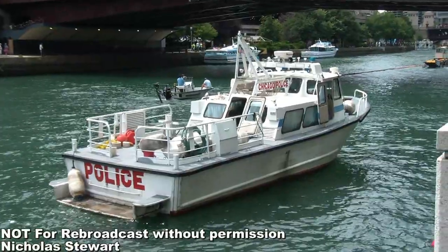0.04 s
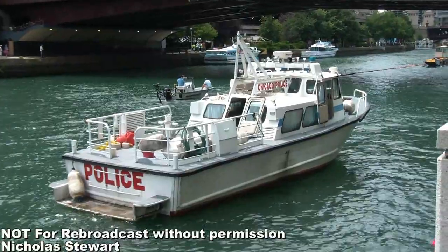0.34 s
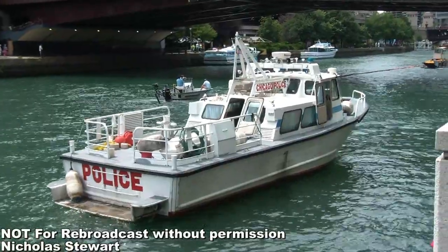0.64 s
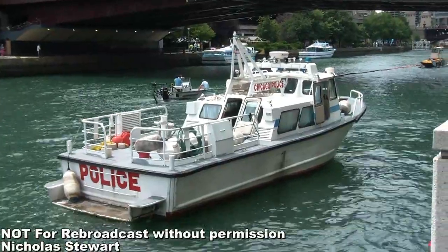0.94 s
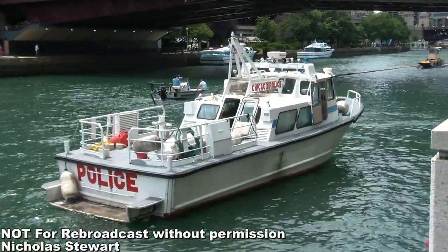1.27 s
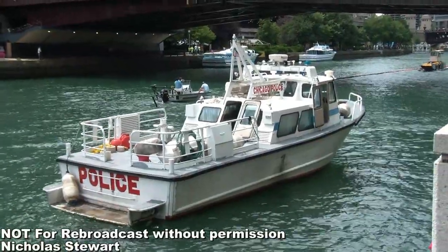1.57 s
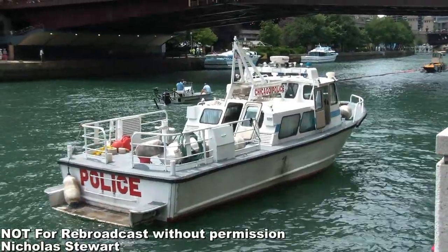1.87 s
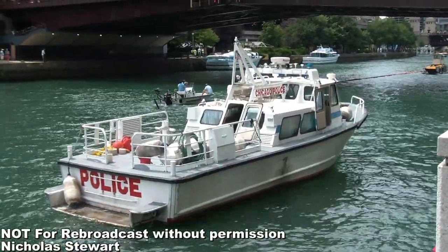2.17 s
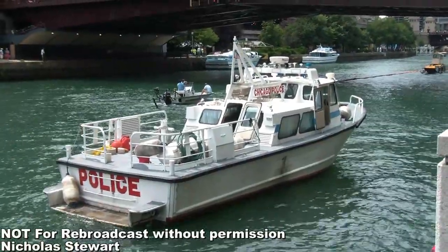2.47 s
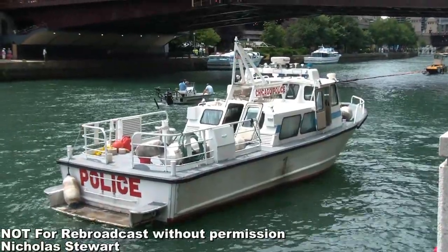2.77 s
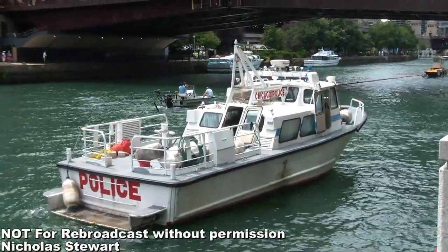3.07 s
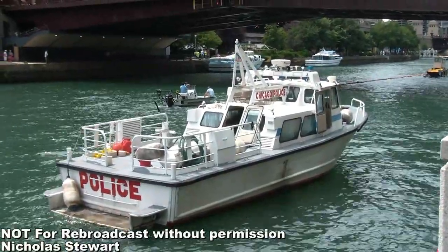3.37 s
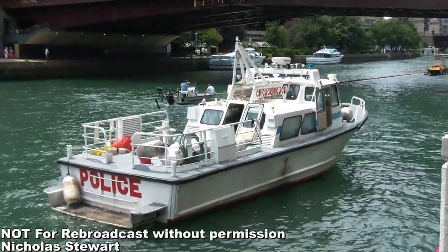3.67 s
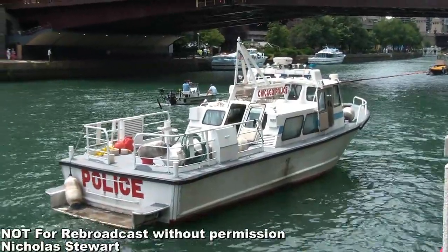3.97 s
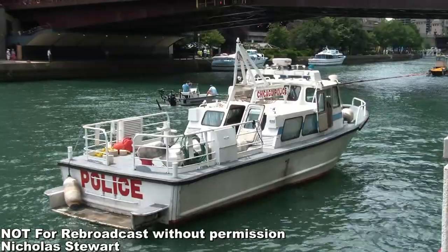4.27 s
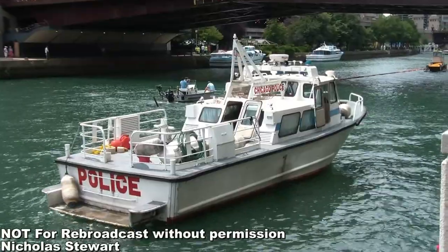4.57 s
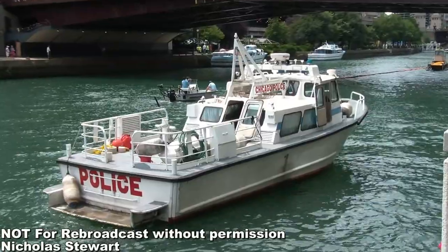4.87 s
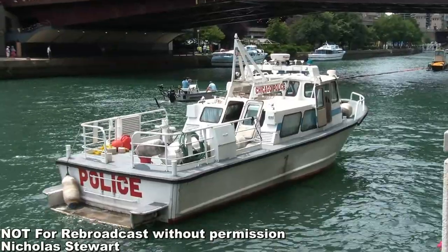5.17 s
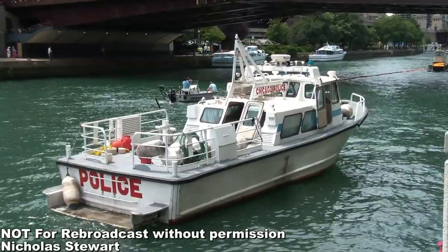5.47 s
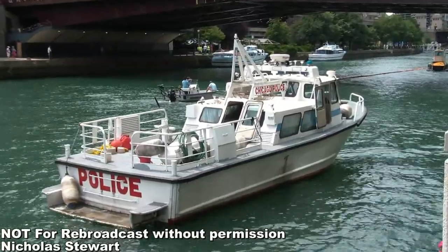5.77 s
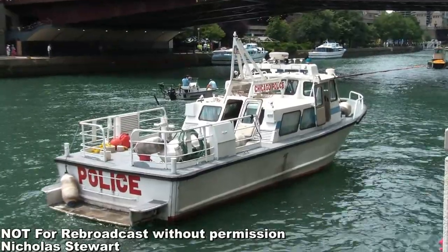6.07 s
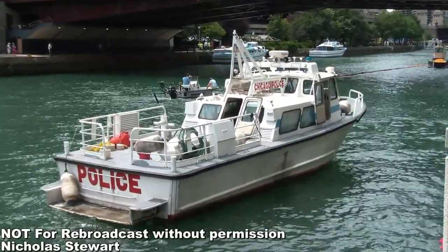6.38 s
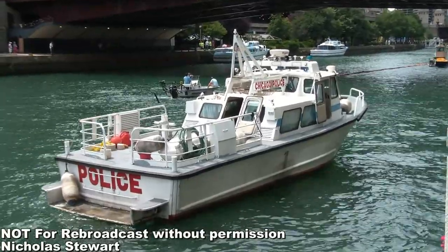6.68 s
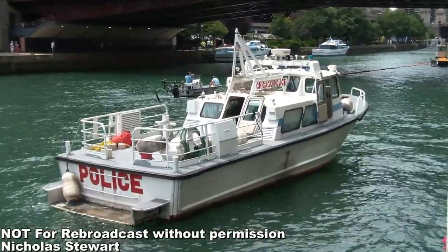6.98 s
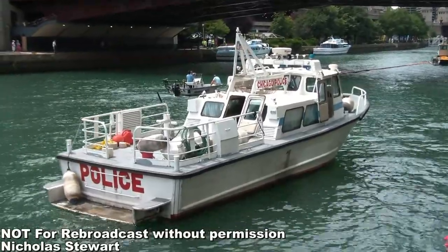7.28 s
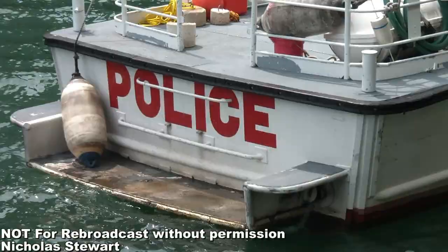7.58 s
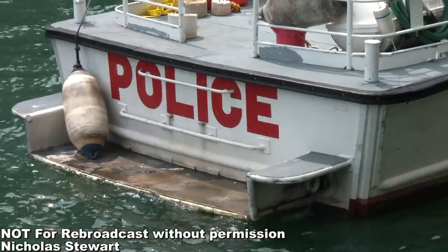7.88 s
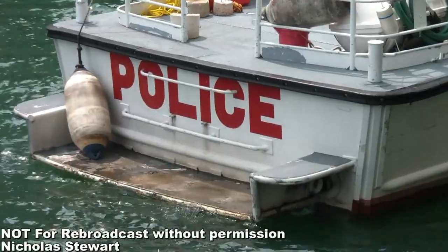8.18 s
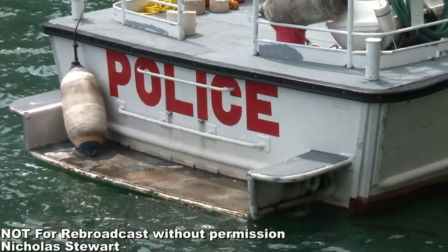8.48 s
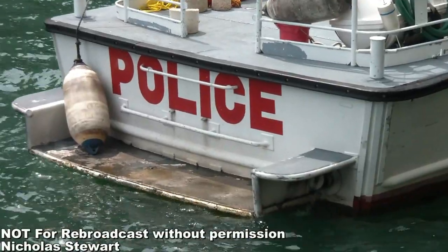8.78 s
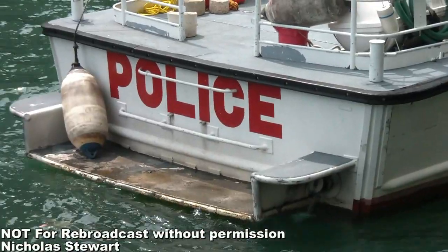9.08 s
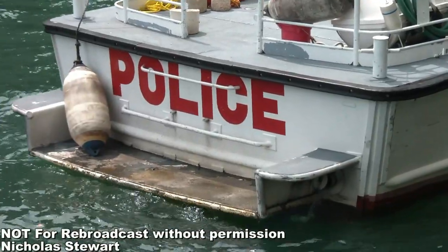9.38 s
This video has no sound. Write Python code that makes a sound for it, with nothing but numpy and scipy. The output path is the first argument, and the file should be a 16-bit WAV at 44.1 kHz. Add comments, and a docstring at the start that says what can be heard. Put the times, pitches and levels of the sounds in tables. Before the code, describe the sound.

A boat idles on a river, its two diesel engines making a deep, throbbing hum with a faint thin whine. Cooling water sloshes and splashes steadily from the stern, with occasional gurgles and ticking drops. A breeze buffets the microphone through the first half, then dies away. Near the end a gear engages with a soft thump; the engine note sags briefly and climbs back.

```python
"""Patrol boat idling on a river

Two diesels at slightly different speeds burble through wet exhausts. One is put in gear: it lugs,
then its governor pulls it up. Cooling water slops and spurts from the stern, drops tick on the river,
a belt-driven accessory whines faintly. A breeze buffets the microphone for the first five seconds."""
import sys
import numpy as np
from scipy import signal
from scipy.fft import rfft, irfft, next_fast_len
from scipy.io import wavfile
from scipy.ndimage import uniform_filter1d

SR = 44100
rng = np.random.default_rng(int(sys.argv[2]) if len(sys.argv) > 2 else 0)


def file_out(sig):
    """Save sig as 16-bit WAV at sys.argv[1]."""
    # one column per channel
    cols = np.atleast_2d(sig).T
    # limit, then scale
    lim = np.clip(cols, -1, 1)
    pcm = np.round(lim * 32767).astype(np.int16)
    wavfile.write(sys.argv[1], SR, pcm)


N = 415863
TIME_S = np.arange(N) / SR

GEAR_S, LUG_S, RECOVERY_S = 7.63, .235, .23  # clutch instant, then two durations
MAIN_START_TURNS = .88  # one turn = one working cycle

# main exhaust notes: order (multiple of the cycle rate), idle level/dB, in-gear level/dB
MAIN_NOTES = [(4, -40, -39.5), (6, -50, -48), (8, -41.5, -49), (10, -37.5, -41), (11, -31.5, -39),
              (12, -25, -26.5), (13, -37, -43), (14, -20.5, -16.5), (15, -20.2, -23.5), (16, -18.4, -15.5),
              (17, -18, -24), (18, -30.5, -34), (19, -26.5, -29), (20, -36, -37), (21, -26.8, -26.5),
              (22, -27.5, -28), (23, -42, -34), (24, -39.5, -43), (25, -19.5, -20.5), (26, -40.5, -38),
              (27, -37.5, -42), (28, -47, -43), (29, -37, -39), (30, -32.8, -31), (31, -31.2, -50),
              (32, -45, -50), (33, -44.5, -47), (35, -43, -44), (36, -39, -38), (37, -39.5, -41),
              (38, -48.5, -50), (39, -43, -44), (43, -45, -46.5), (49, -51, -37.5), (51, -38.5, -47),
              (62, -46, -46), (63, -44, -48), (64, -46, -44)]
# main engine idle: t/s, cycle rate/Hz
MAIN_IDLE_HZ = [(0, 10.265), (3, 10.305), (4.6, 10.335), (6, 10.298)]
# main exhaust trim: t/s, low throb gain/dB, upper hum gain/dB
MAIN_TRIM_DB = [(0, -.5, -3), (.7, -.7, -2), (1.3, .3, 0), (2.6, 0, .7), (4.2, -.3, .3), (5.1, .5, -.3),
                (5.9, .7, 1.4), (7.4, .7, 2.1), (8.1, 1, 2), (8.6, 1, -.6), (9.3, -.5, .5)]
# second exhaust notes: order, level/dB
SECOND_NOTES = [(8, -37.5), (9, -44.5), (10, -40.5), (12, -30.5), (13, -41), (14, -47), (16, -38),
                (17, -37), (18, -31), (19, -38.5), (20, -21.3), (22, -34), (23, -41), (24, -39),
                (26, -44.5), (28, -43), (29, -30), (30, -36.5)]
# cooling water flow: t/s, level/dB
FLOW_DB = [(0, 3.5), (.25, -2), (.47, -1), (.65, 0), (2.6, 0.7), (3.8, -0.5), (4.3, 0.5), (5.4, 1.5),
           (5.65, -0.5), (6.1, 1.5), (8.3, 1), (8.55, -1.4), (9.15, 2), (9.4, 0.5)]
# water spurts: t/s, half-width/s, slosh rise/dB, splash rise/dB, spray rise/dB
WATER_SPURTS = [(0.64, 0.054, -0.5, 2.5, 2.5), (0.906, 0.027, 4.5, 3, 1), (0.995, 0.028, 2, 1.5, 7),
                (1.64, .03, 3.5, 2, 2), (1.883, 0.032, 2.5, 0.5, 2), (2.43, 0.075, 2.5, 2, 3),
                (2.545, 0.053, 0, 0.5, 3), (3.21, 0.023, -1, 2, 4), (4.092, .03, 0, 2, 5),
                (4.445, 0.098, 0.5, 1, 1), (4.755, .02, -2, -1, -1), (5.446, 0.024, 0.5, 2, 6),
                (6.11, 0.12, 1, 1, 5), (7.185, 0.023, 3, 4.5, 4), (7.865, .04, 1, 1, 4)]
# gas bubbling under the stern: t/s, level/dB
BUBBLING_DB = [(0, -24), (.6, -25.5), (.95, -22), (1.3, -25), (2.2, -24), (2.55, -21), (3, -25), (3.8, -25),
               (4.45, -22.5), (4.9, -26.5), (5.8, -27.5), (6.2, -23.5), (7.6, -25), (8.05, -24),
               (8.6, -26.5)]
# spectra of bubbling and water: f/Hz, relative density/dB
RUMBLE_SPECTRUM = [(12, -37), (25, -22), (45, -13), (95, -8), (130, -5.5), (180, 0.4), (250, -8), (320, -9),
                   (430, -13.5), (600, -13.5), (760, -24), (1100, -41)]
SLOSH_SPECTRUM = [(550, -4), (740, 0.4), (950, 2.5), (1040, 1.5), (1140, -3), (1450, -3), (1800, -8.5),
                  (2300, -36)]
SPLASH_SPECTRUM = [(1400, -14.5), (1850, 0.5), (2500, -1.5), (3100, -3), (4000, -5.5), (5400, -9.5),
                   (6500, -16.5), (8000, -27)]
SPRAY_SPECTRUM = [(5000, -8), (6500, -6.5), (7700, 0), (8800, -3), (10500, -4), (13500, -10), (15000, -16)]
# stereo image of the water: f/Hz, left-right correlation
WATER_CORRELATION = [(25, .8), (60, 0.94), (150, 1), (300, 1), (600, 1), (1200, 0.92), (2500, 0.83),
                     (4500, 0.76), (7000, .05), (12000, 0.29)]
# pipe and outlet resonances: f/Hz, bandwidth/Hz, level/dB
PIPE_MODES = [(525.8, 4, -39.5), (654.5, 26, -38.5), (1030, 44, -48)]
# gas pockets breaking at the outlet: t/s, level/dB, f/Hz, rise time/s
GAS_POCKETS = [(0.907, -31, 970, 0.0054), (1.628, -25, 1060, 0.0054), (2.405, -12, 760, 0.0012),
               (2.488, -27, 1330, .006), (2.5, -20, 1020, 0.007), (2.513, -27, 1220, .003),
               (2.597, -21, 1030, 0.008), (2.696, -21, 1017, 0.0061), (2.792, -28, 1050, 0.0056),
               (3.934, -14.5, 760, 0.0012), (4.347, -27, 1036, 0.00803), (4.442, -21.5, 1046, 0.0062),
               (4.481, -24, 1040, .005), (4.553, -23, 960, 0.0065), (4.579, -25.5, 1030, 0.006),
               (4.629, -29, 1025, 0.0066), (4.756, -22, 1250, 0.0019), (6.089, -23.5, 1030, 0.0069),
               (6.215, -30, 1170, .007), (6.274, -27, 1016, 0.0086)]
# streams of small bubbles: t/s, half-width/s, level/dB
BUBBLE_RUNS = [(2.58, .14, -37), (4.47, .13, -35), (6.15, .12, -38)]
# drops on the river: t/s, peak level/dB, f/Hz
RIVER_DROPS = [(.905, -25, 4500), (1.03, -30, 10500), (1.885, -14.5, 4760), (2.12, -22, 5270),
               (2.566, -26, 4200), (3.204, -18, 3400), (4.08, -25, 10300), (4.09, -25, 5470),
               (4.755, -20, 5400), (4.864, -28, 11000), (4.876, -25, 5500), (5.255, -33, 8700),
               (5.935, -30, 6500), (7.181, -25, 4150), (7.203, -22, 1980), (8.256, -33, 8600)]
# rings in the splashing: t/s, half-width/s, level/dB, f/Hz, bandwidth/Hz
SPLASH_RINGS = [(5.86, .06, -46, 2780, 40), (6.09, .06, -42.5, 2830, 50)]
# accessory tones: harmonic number, level/dB
WHINE_HARMONICS = [(2, -41.5), (3, -54), (4, -62), (5, -58), (7, -63), (8, -65), (9, -62)]
# accessory trim: t/s, gain/dB
WHINE_TRIM_DB = [(0, 1.5), (1.5, 0), (2.3, 1.5), (3, -2), (3.7, 1), (4.2, -3.5), (5, -4), (5.6, 2.5),
                 (5.95, 4.5), (6.4, 0), (7.1, 0), (8.6, -4), (9.2, -1)]
# bridge and quay wall reflections: delay/s, relative gain
WALL_ECHOES = [(0.033, 0.93), (.058, -0.79), (0.098, 0.54), (.151, -0.034), (0.227, -0.18)]
# wind turbulence: f/Hz, relative density/dB
WIND_SPECTRUM = [(12, -26), (25, -11), (45, -2.5), (80, 2.5), (170, 3), (300, -0.5), (500, -6.5),
                 (800, -18.5), (1500, -29.5), (3000, -55)]
# gusts: t/s, half-width/s, rise/dB
WIND_GUSTS = [(.2, 0.3, 4), (1.044, 0.45, 5), (1.75, 0.17, 3), (2.64, 0.18, 7.5), (4.192, 0.28, 2)]


def main_engine(lug_note_db=-11.3, lug_others_db=-13, bark_db=-41, pull_db=5, ring_db=4.5):
    """Diesel going from idle to gear; in between it lugs and the extra fuel makes it bark."""
    upper_order, last_bark_order, hum_order = 22, 35, 25
    cycle_hz = main_cycle_hz()
    in_gear, lugging = clutch_load()
    firing = np.sqrt(in_gear * lugging)
    pulling_up = np.sin(np.pi * ramp(GEAR_S + LUG_S, RECOVERY_S))
    dip_db = -7 * swell(8.1, .028)  # throb dips briefly as speed returns
    throb_db, hum_db = curves(MAIN_TRIM_DB)
    notes = []
    for order, idle_db, gear_db in MAIN_NOTES:
        note_hz = order * cycle_hz
        level_db = idle_db + in_gear * (gear_db - idle_db)
        level_db += lug_others_db * lugging ** 2 * (order <= hum_order)
        level_db += pull_db * pulling_up * (order == hum_order)
        level_db += ring_db * in_gear * resonance(note_hz, centre_hz=318, half_width_hz=2.2)  # pipe
        if order % 4 == 0:  # firing notes stand out while lugging
            boom = from_db(lug_note_db) * resonance(note_hz, centre_hz=151, half_width_hz=30) ** 2
            bark = from_db(bark_db) * (upper_order <= order <= last_bark_order)
            level_db = np.maximum(level_db, 20 * np.log10((boom + bark) * np.sqrt(firing) + 1e-9))
        level_db += throb_db + dip_db if order < upper_order else hum_db
        notes.append((order, level_db))
    return exhaust(cycle_hz, notes, MAIN_START_TURNS, uneven_db=1.2, jitter_turns=.0008)


def clutch_load(grip_s=.07):
    """Gear engagement and clutch drag, both 0-1."""
    in_gear = ramp(GEAR_S - grip_s / 3, grip_s)
    return in_gear, in_gear * (1 - ramp(GEAR_S + LUG_S, RECOVERY_S))


def main_cycle_hz(sag_hz=1.72, overshoot_hz=.45, overshoot_s=.403):
    """The clutch drags the idle down; the governor waits, overshoots and settles."""
    idle_hz, = curves(MAIN_IDLE_HZ)
    _, lugging = clutch_load()
    settling = np.maximum(TIME_S - GEAR_S - LUG_S - RECOVERY_S, 0) / overshoot_s
    return idle_hz - sag_hz * lugging + overshoot_hz * settling * np.exp(1 - settling)


def second_engine(cycle_hz=9.458):
    """Slower, steady diesel beating against the main one."""
    return exhaust(np.full(N, cycle_hz), SECOND_NOTES, start_turns=.6, uneven_db=2.5, jitter_turns=.00076)


def exhaust(cycle_hz, notes, start_turns, uneven_db, jitter_turns):
    """One pressure burst per cycle, smeared by the pipe into a throb and weaker beats."""
    turns = np.cumsum(cycle_hz) / SR + start_turns + jitter_turns * drift(5.5)
    pressure = np.zeros(N)
    for order, level_db in notes:
        offset = order - 16  # from the main pipe resonance
        lag_turns = .196 * offset ** 2 / 2 - .063 * offset ** 3
        gain = from_db(level_db + uneven_db * drift(4.3))
        pressure += gain * np.cos(2 * np.pi * (order * turns - lag_turns))
    return np.sqrt(2) * pressure


def clutch_thump(level_db=-22, hz=75, half_width_s=.017):
    """Soft thump through the hull as the gear takes hold."""
    return from_db(level_db) * swell(GEAR_S, half_width_s) * np.sin(2 * np.pi * hz * (TIME_S - GEAR_S))


def wet_exhaust(pressure, slop_hz=2.6, slop_db=-.02, throb_window_s=.012):
    """Gas bubbles through the cooling water and throws it out in time with the pressure."""
    flow_db = curves(FLOW_DB)[0] + slop_db * np.cos(2 * np.pi * slop_hz * (TIME_S - .267))
    spurts_db = sum(np.outer(rise_db, swell(t_s, half_s)) for t_s, half_s, *rise_db in WATER_SPURTS)
    slosh_rise_db, splash_rise_db, spray_rise_db = spurts_db
    push = unit_rms(pressure)
    power = uniform_filter1d(pressure ** 2, round(throb_window_s * SR))
    gas = unit_rms(np.sqrt(np.abs(power))) * rng.standard_normal((2, N))
    rumble = from_db(curves(BUBBLING_DB)[0]) * water_stereo(RUMBLE_SPECTRUM, gas)
    slosh_db = -32 + .9 * flow_db + slosh_rise_db + .39 * push + .53 * drift(22)
    splash_db = -36.5 + flow_db + splash_rise_db + .5 * push + .96 * drift(27)
    spray_db = -51.5 + 1.1 * flow_db + spray_rise_db + 1.55 * drift(22)
    slosh = water_stereo(SLOSH_SPECTRUM, droplets(per_s=500, spread_db=3.1, grain_db=-9.5))
    splash = water_stereo(SPLASH_SPECTRUM, droplets(per_s=1500, spread_db=2.5, grain_db=-8.5))
    spray = water_stereo(SPRAY_SPECTRUM, droplets(per_s=400, spread_db=6.2, grain_db=-8))
    return rumble + from_db(slosh_db) * slosh + from_db(splash_db) * splash + from_db(spray_db) * spray


def droplets(per_s, spread_db, grain_db):
    """Tiny impacts of uneven size over a smooth wash."""
    sizes = from_db(spread_db * np.minimum(rng.exponential(1, (2, N)), 4))
    clicks = (rng.random((2, N)) < per_s / SR) * sizes * rng.choice([-1, 1], (2, N))
    return from_db(grain_db) * unit_rms(clicks) + rng.standard_normal((2, N))


def pipe_ring(pulsing_db=1.5, stereo_spread=.15):
    """Gas spurts ring the pipe at pitches independent of engine speed."""
    out = np.zeros((2, N))
    for hz, width_hz, level_db in PIPE_MODES:
        band = bandpass(1, hz - width_hz / 2, hz + width_hz / 2)
        pulsing = from_db(pulsing_db * drift(19))
        gas = pulsing * (rng.standard_normal(N) + stereo_spread * rng.standard_normal((2, N)))
        out += from_db(level_db) * unit_rms(signal.sosfilt(band, gas))
    return out


def outlet_pips(level_db=-35, uneven_db=1.8, hz=1045, rise_s=.005, crest_turns=.6):
    """Each cycle's strongest puff rings the outlet, unless a gas pocket breaks instead."""
    cycle_hz = main_cycle_hz()
    turns = np.cumsum(cycle_hz) / SR + MAIN_START_TURNS
    age_s = (turns - crest_turns + rise_s * cycle_hz) % 1 / cycle_hz
    no_pocket = np.maximum(1 - sum(swell(t_s, .025) for t_s, *_ in GAS_POCKETS), 0)
    gain = from_db(level_db + uneven_db * drift(5.3)) * no_pocket
    return gain * puff(age_s, rise_s) * np.sin(2 * np.pi * hz * age_s)


def gurgles(splutter_gain=.5, band_ratio=1.25):
    """Gas pockets break: short rings roughened by thrown water."""
    out, age_s = np.zeros(N), np.arange(SR // 12) / SR
    for t_s, level_db, hz, rise_s in GAS_POCKETS:
        band = bandpass(2, hz / band_ratio, hz * band_ratio)
        splutter = unit_rms(signal.sosfilt(band, rng.standard_normal(len(age_s))))
        ring = np.sin(2 * np.pi * (hz * age_s + rng.random())) + splutter_gain * splutter
        start = round((t_s - rise_s) * SR)
        out[start:start + len(age_s)] += from_db(level_db) * puff(age_s, rise_s) * ring
    return out


def bubble_runs(rough_db=1.5):
    """Streams of small bubbles keep the outlet ringing roughly."""
    envelope = sum(from_db(level_db) * swell(t_s, half_s) for t_s, half_s, level_db in BUBBLE_RUNS)
    return envelope * from_db(rough_db * drift(30)) * narrow_noise(hz=1030, width_hz=86)


def drops(decay_s=.0018, band_ratio=1.28, crack_gain=.24):
    """Drops hit the river: a short ring under a crack of treble."""
    out, age_s = np.zeros((2, N)), np.arange(SR // 40) / SR
    for t_s, peak_db, hz in RIVER_DROPS:
        ring_band = bandpass(1, hz / band_ratio, hz * band_ratio)
        crack_band = bandpass(2, hz, min(2 * hz, .45 * SR))
        noise = rng.standard_normal(len(age_s)) + 1.2 * rng.standard_normal((2, len(age_s)))
        burst = noise * np.exp(-age_s / decay_s)
        ring = signal.sosfilt(np.vstack([ring_band, ring_band]), burst)
        tick = ring + crack_gain * signal.sosfilt(crack_band, burst)
        start = round(t_s * SR)
        out[:, start:start + len(age_s)] += from_db(peak_db) * tick / np.abs(tick).max()
    return out


def splash_rings():
    """Faint narrow bands swell and fade in the splashing."""
    return sum(from_db(level_db) * swell(t_s, half_s) * narrow_noise(hz, width_hz)
               for t_s, half_s, level_db, hz, width_hz in SPLASH_RINGS)


def accessory_whine(base_hz=338, waver=.00074, flutter_db=1.0):
    """Belt-driven accessory: a thin, wavering stack of harmonics."""
    turns = np.cumsum(base_hz * (1 + waver * drift(3))) / SR
    tones = sum(from_db(level_db + flutter_db * drift(8.2)) * np.sin(2 * np.pi * harmonic * turns)
                for harmonic, level_db in WHINE_HARMONICS)
    return np.sqrt(2) * from_db(curves(WHINE_TRIM_DB)[0]) * tones


def wall_echoes(sound, gain_db=-27, low_cut_hz=110):
    """Side echoes off bridge and quay; long waves differ little between the ears."""
    echoes = sum(gain * np.interp(TIME_S - delay_s, TIME_S, sound, left=0)
                 for delay_s, gain in WALL_ECHOES)
    low_cut = signal.butter(2, low_cut_hz, "high", fs=SR, output="sos")
    return from_db(gain_db) * signal.sosfilt(low_cut, echoes)


def wind(breeze_db=-23, calm_db=-43, hold_s=4.44, fall_db_per_s=11.5, lumps_db=2.5):
    """Lumpy turbulence, separate per channel; gusts, then dies to a faint stir."""
    base_db = np.maximum(breeze_db - fall_db_per_s * np.maximum(TIME_S - hold_s, 0), calm_db)
    gust_db = sum(rise_db * swell(t_s, half_s) for t_s, half_s, rise_db in WIND_GUSTS)
    size = next_fast_len(N, True)
    shape = from_db(at_hz(WIND_SPECTRUM, np.fft.rfftfreq(size, 1 / SR), -np.inf))
    eddies = unit_rms(irfft(rfft(rng.standard_normal((2, size))) * shape, size)[:, :N])
    return from_db(base_db + gust_db + lumps_db * np.array([drift(7), drift(8.9)])) * eddies


def water_stereo(spectrum, noise_pair):
    """Two independent noises to a shaped, partly correlated stereo pair; rms 1."""
    size = next_fast_len(N, True)
    hz = np.fft.rfftfreq(size, 1 / SR)
    mid, side = rfft(noise_pair, size) * from_db(at_hz(spectrum, hz, -np.inf))
    correlation = at_hz(WATER_CORRELATION, hz)
    mid, side = irfft([mid * np.sqrt(1 + correlation), side * np.sqrt(1 - correlation)], size)[:, :N]
    return unit_rms(np.array([mid + side, mid - side]))


def narrow_noise(hz, width_hz):
    """Noise band; rms 1."""
    band = bandpass(2, hz - width_hz / 2, hz + width_hz / 2)
    return unit_rms(signal.sosfilt(band, rng.standard_normal(N)))


def drift(rate_hz, hop=100, warmup=1000):
    """Slow random wander; rms 1."""
    pole = np.exp(-2 * np.pi * rate_hz * hop / SR)
    noise = rng.standard_normal(N // hop + warmup + 2)
    slow = signal.lfilter([1], [1, -2 * pole, pole * pole], noise)[warmup:]
    return np.interp(np.arange(N) / hop, np.arange(len(slow)), unit_rms(slow))


def bandpass(order, low_hz, high_hz):
    """Band-pass filter sections."""
    return signal.butter(order, [low_hz, high_hz], "band", fs=SR, output="sos")


def resonance(hz, centre_hz, half_width_hz):
    """Resonance curve; peak 1."""
    return 1 / (1 + ((hz - centre_hz) / half_width_hz) ** 2)


def puff(age_s, rise_s):
    """Rise to 1 at rise_s, then decay."""
    return (age_s / rise_s * np.exp(1 - age_s / rise_s)) ** 2


def swell(t_s, half_s):
    """Bell curve: 1 at t_s, 1/e at half_s either side."""
    return np.exp(-((TIME_S - t_s) / half_s) ** 2)


def ramp(start_s, length_s):
    """Linear 0 to 1."""
    return np.clip((TIME_S - start_s) / length_s, 0, 1)


def curves(rows):
    """Each value column of a time table, per sample."""
    t_s, *columns = np.transpose(rows)
    return [np.interp(TIME_S, t_s, column) for column in columns]


def at_hz(rows, hz, outside=None):
    """Table lookup on a log-frequency axis."""
    known_hz, values = np.transpose(rows)
    return np.interp(np.log(hz + 1e-9), np.log(known_hz), values, left=outside, right=outside)


def from_db(db):
    """Decibels to gain."""
    return 10 ** (np.asarray(db) / 20)


def unit_rms(x):
    """Scale to rms 1."""
    return x / np.sqrt(np.mean(x ** 2) + 1e-20)


def scene(outlet_pan_db=2.0):
    """Engines centred, outlet slightly left, water spread around them."""
    sides = np.array([[1], [-1]])
    engines = main_engine() + second_engine()
    outlet = (pipe_ring() + outlet_pips() + gurgles() + bubble_runs()) * from_db(outlet_pan_db * sides)
    boat = engines + accessory_whine() + clutch_thump() + wet_exhaust(engines) + outlet
    return boat + sides * wall_echoes(engines) + drops() + splash_rings() + wind()


def record(dry, cutoff_hz=15100):
    """Soft limit at full scale, then a steep low-pass."""
    limited = dry / (1 + dry ** 16) ** (1 / 16)
    return signal.sosfilt(signal.ellip(10, .1, 80, cutoff_hz, fs=SR, output="sos"), limited)


dry = scene()
out = record(dry)
file_out(out)
```